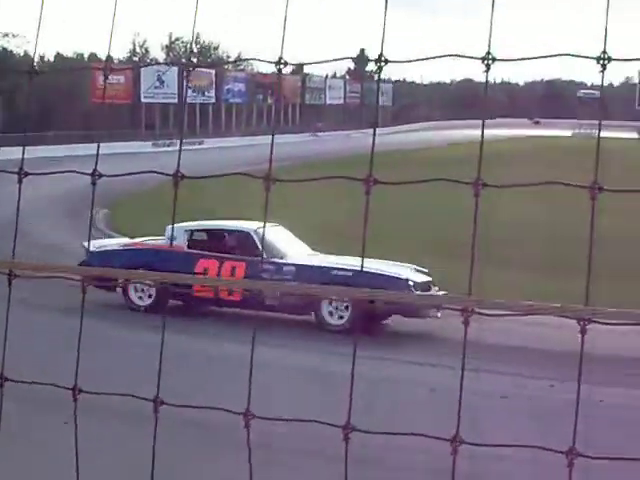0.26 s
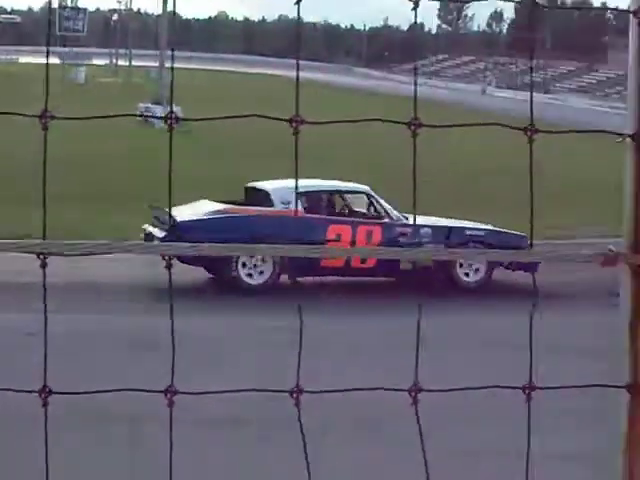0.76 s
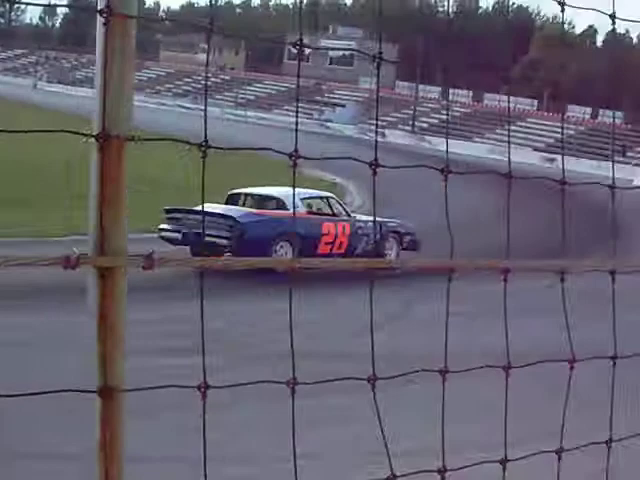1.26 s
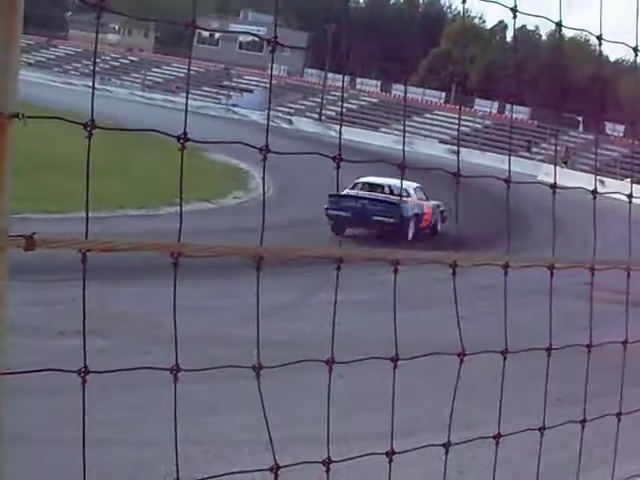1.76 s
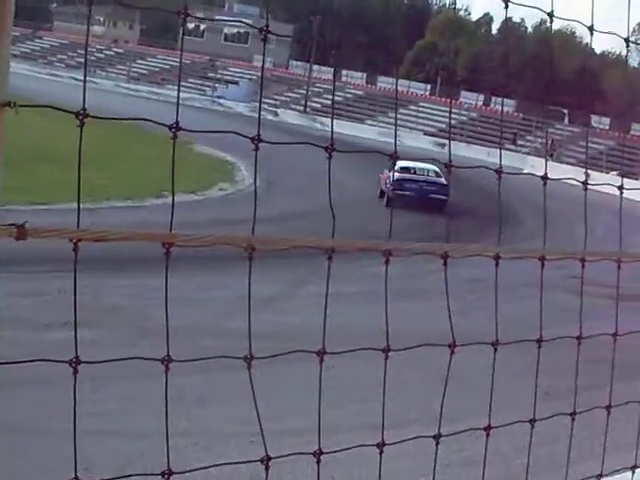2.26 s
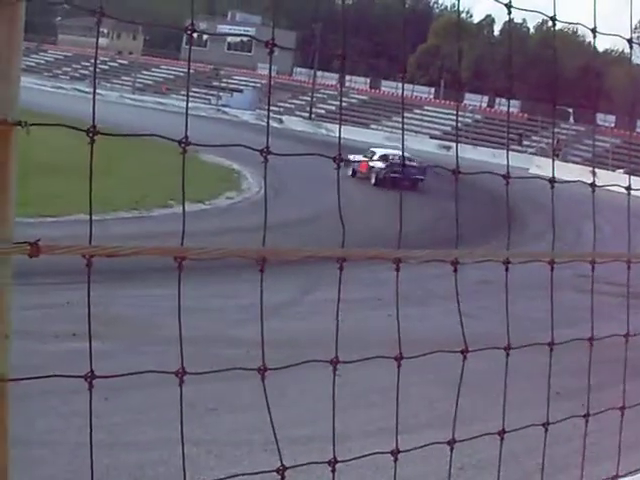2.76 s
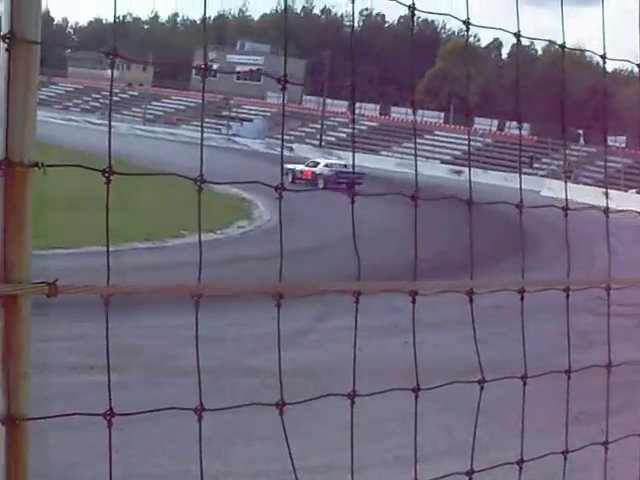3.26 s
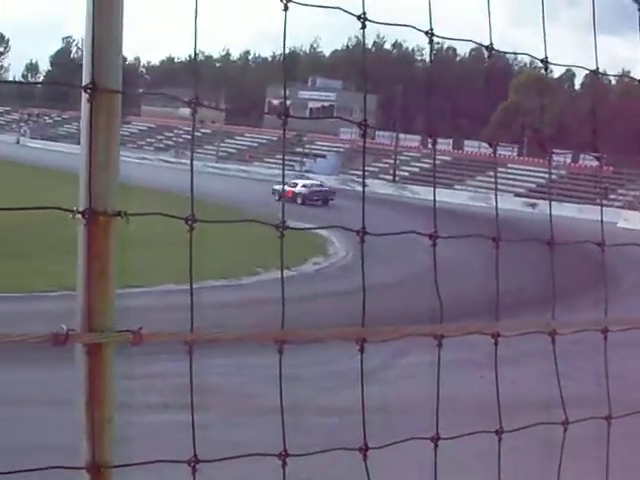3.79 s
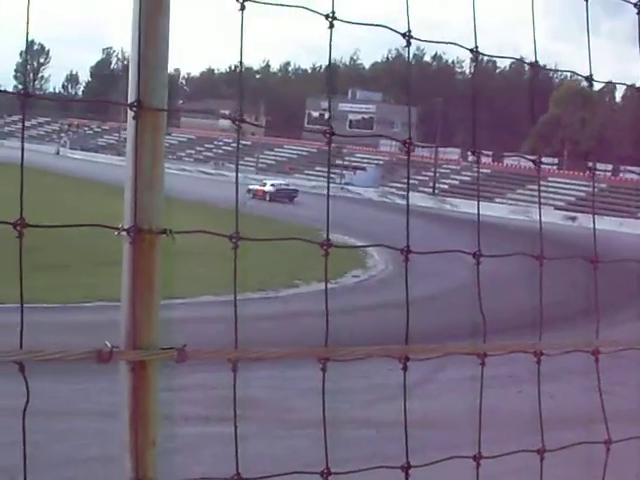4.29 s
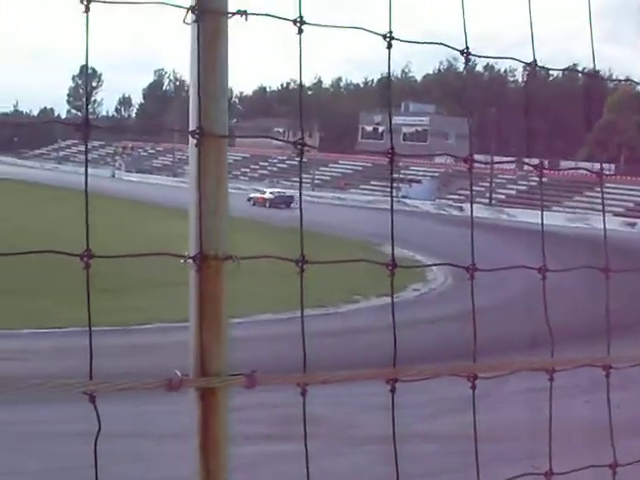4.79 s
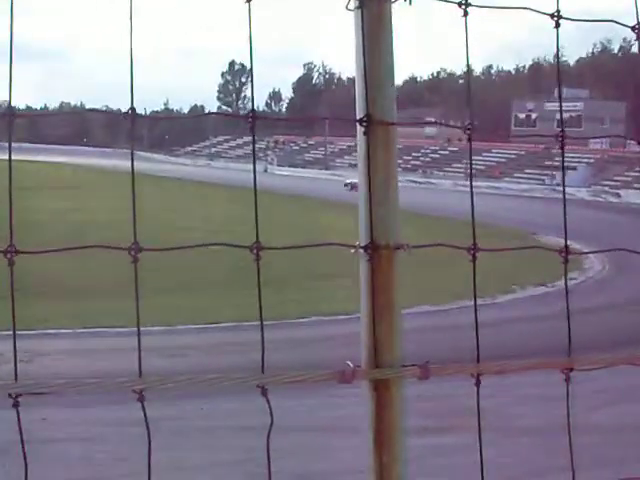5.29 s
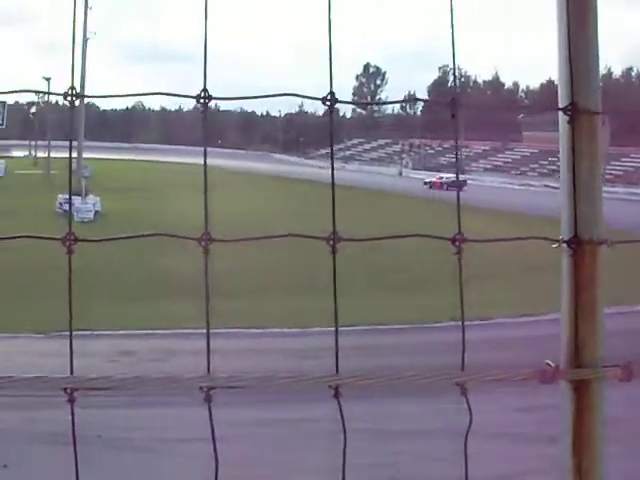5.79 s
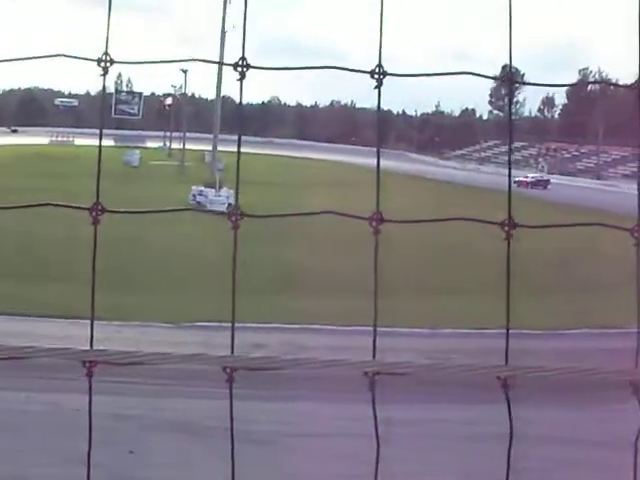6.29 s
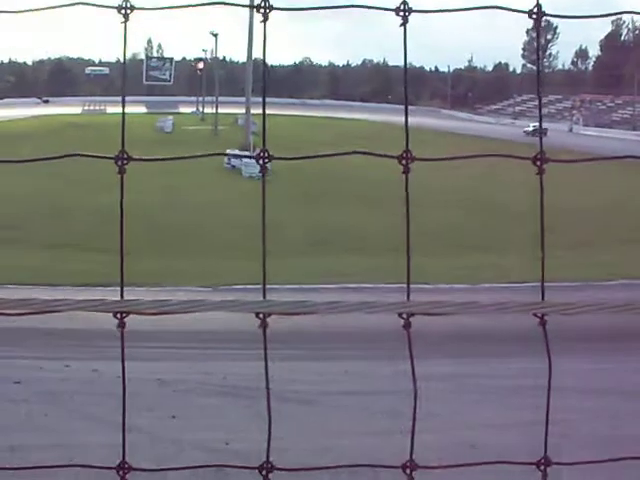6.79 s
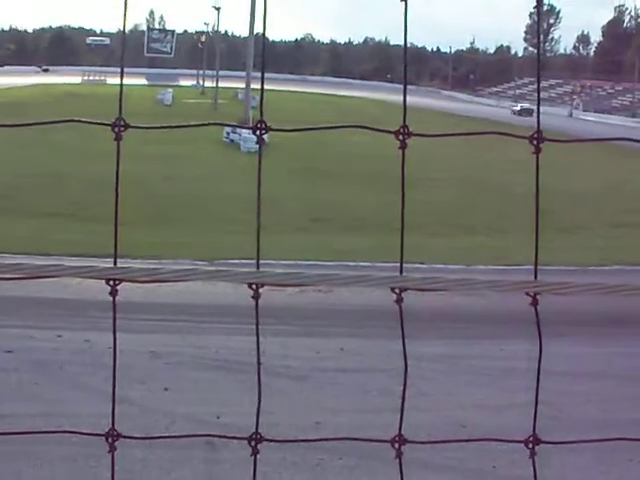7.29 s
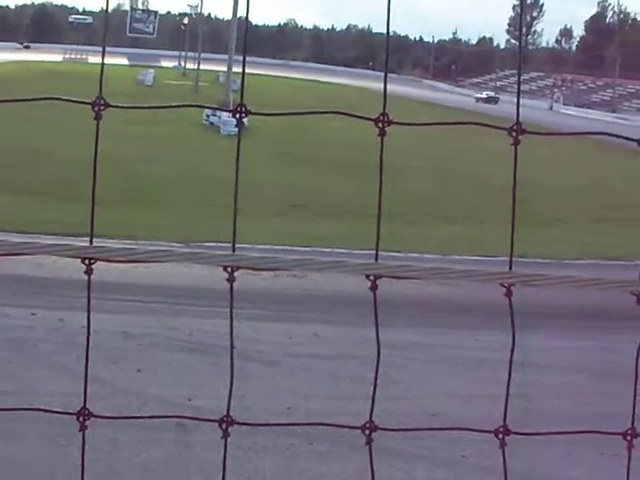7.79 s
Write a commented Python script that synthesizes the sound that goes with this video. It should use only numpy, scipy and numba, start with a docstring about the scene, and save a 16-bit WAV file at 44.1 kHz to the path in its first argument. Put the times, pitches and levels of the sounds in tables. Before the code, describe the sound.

A V8 stock car roars past close by on an outdoor oval, its exhaust blast thumping and overloading a small microphone. The throttle shuts and the pitch drops to a ragged burble with a few sharp cracks. The engine then revs up as it pulls away, lifts again with a faint splutter and crackle, and drones on far off, echoing from the stands. Light wind rumbles underneath.

```python
"""Stock car lapping an oval

A V8 passes close to the fence, lifts off, pulls out of the turn and runs down the far straight.
Its unevenly firing cylinder bank booms, barks and howls, the exhaust gas rasps once a cycle, and
unburnt fuel crackles in the pipes; the stands throw the engine back. As the car goes by, its exhaust
blast thumps a small microphone, which overloads; a light wind rumbles underneath."""
import sys
import numpy as np
from scipy import signal
from scipy.fft import rfft, irfft, next_fast_len
from scipy.io import wavfile
from scipy.ndimage import uniform_filter1d, map_coordinates
from numba import njit

SR = 44100
rng = np.random.default_rng(int(sys.argv[2]) if len(sys.argv) > 2 else 0)


def unload_audio(sound):
    """Save the sound as a 16-bit wav file, at the path given as the first command line argument."""
    columns = np.transpose(np.atleast_2d(sound))
    # keep every value between -1 and 1, then stretch to whole-number steps
    steps = np.round(np.clip(columns, -1, 1) * 32767)
    wavfile.write(sys.argv[1], SR, steps.astype(np.int16))


N = 355005
TIME = np.arange(N) / SR

# engine speed as heard; a cycle is two crank turns and eight firings: (time [s], cycle rate [Hz])
CYCLE_RATE = [(0.0, 33.62), (.33, 33.62), (.49, 31.6), (.53, 26.5), (0.573, 26.03), (0.811, 23.96),
              (1.247, 25.43), (1.562, 25.07), (2.024, 26.45), (2.231, 28.27), (3.469, 33.98),
              (3.709, 34.31), (4.002, 33.71), (4.18, 33.92), (4.462, 30.37), (4.952, 30.61), (5.659, 28.8),
              (6.0, 29.4), (7.05, 29.49), (7.45, 28.32), (8.05, 28.62)]
# the driver's foot: (time [s], throttle [0-1])
PEDAL = [(.45, 0.65), (.55, 0), (2.05, 0.03), (2.15, 0.64), (4.1, 0.98), (4.3, 0.06), (6.4, 0.2),
         (7.0, 0.63)]
# the eight firing slots of a cycle: (pressure pulse [dB], gas rush [dB], header lag [slots])
FIRING_PATTERN = [(-0.5, 2, -0.0086), (-15, -2, 0.051), (-16, 5, -.1), (-5.5, -10, 0.255),
                  (-16, -4, -0.074), (-8.5, -6.5, 0.148), (-10, -4, -0.196), (-13.5, -5, 0.28)]
# how the car faces us: (time [s], side [0 front, 1 beside, 2 behind, 3 leaving the turn, 4 far])
FACING = [(.45, 0.12), (.6, 0.92), (1.95, 1.56), (2.2, 2.38), (2.9, 2.15), (3.3, 2.87), (4.05, 2.63),
          (4.35, 4.14)]

BLAST_S, BLAST_WIDTH_S = 0.31, 0.15  # the pipes point at the fence as the car goes by
HIDDEN_S, HIDDEN_WIDTH_S = 1.22, 0.55  # swinging away, the body hides the pipes
FAR_SHARE = 0.87  # reflected share of the sound at great distance


def undb(db):
    """Decibels to gain."""
    return 10 ** (np.asarray(db) / 20)


def curves(table):
    """Every column of a table, joined by straight lines in time."""
    times, *columns = np.transpose(table)
    return [np.interp(TIME, times, column) for column in columns]


def bell(centre_s, width_s):
    """A smooth swell from 0 to 1 and back."""
    return np.exp(-((TIME - centre_s) / width_s) ** 2)


def drift(rate_hz):
    """Smooth random modulation with a spread of about 1."""
    knots, coarse = rng.standard_normal(4096), TIME[::64]
    return np.interp(TIME, coarse, map_coordinates(knots, [coarse * rate_hz], order=3, mode="wrap"))


def steady(x):
    """Ride the running level to 1, keeping the throb of single cycles."""
    size = SR // 7
    return x / np.sqrt(uniform_filter1d(uniform_filter1d(x * x, size), size) + 1e-12)


def colour(x, points):
    """Minimum-phase EQ through points of (frequency [Hz], gain [dB])."""
    size = 4096
    hz, db = np.transpose(points)
    bins = np.maximum(np.arange(size // 2 + 1) * SR / size, 1)
    cepstrum = irfft(np.log(undb(np.interp(np.log(bins), np.log(hz), db))))
    cepstrum[1:size // 2] *= 2
    cepstrum[size // 2 + 1:] = 0
    return signal.fftconvolve(x, irfft(np.exp(rfft(cepstrum))))[:N]


def band(x, low_hz, high_hz):
    """Steep band-pass without delay."""
    return signal.sosfiltfilt(signal.butter(4, [low_hz, high_hz], "band", fs=SR, output="sos"), x)


@njit
def swept_band(x, hz, width):
    """State-variable band-pass with a moving centre and a width relative to it."""
    out, band_state, low_state = np.empty(len(x)), 0., 0.
    for i in range(len(x)):
        g = np.tan(np.pi * hz[i] / SR)
        passed = (band_state + g * (x[i] - low_state)) / (1 + g * (g + width))
        band_state = 2 * passed - band_state
        low_state += 2 * g * passed
        out[i] = width * passed
    return out


def buffeting(breeze_db=-54, sway_db=3):
    """Over a light breeze, a low thump as the exhaust blast hits the microphone, then two soft gusts."""
    # the exhaust thump, then the two wind gusts: (time [s], half width [s], level [dB])
    air_pushes = [(.255, 0.06, -22), (5.9, 0.55, -45.5), (7.9, 0.55, -42.5)]
    # tone of the buffeting: (frequency [Hz], gain [dB])
    buffet_eq = [(12, -16), (28, 9.5), (50, -10), (90, -12.5), (300, -40.5)]
    breeze = undb(breeze_db + sway_db * drift(2.0))
    swells = sum(undb(db) * bell(s, width) for s, width, db in air_pushes)
    return steady(colour(rng.standard_normal(N), buffet_eq)) * (breeze + swells)


def path(echo_m=35.4, hidden_share=0.67):
    """The car's gain with distance (0 dB at 10 m), and the share of its sound that comes reflected."""
    # the way round the oval: (time [s], distance [m])
    distance = [(0, 13.4), (.5, 14.3), (1.15, 25.2), (2.2, 24.6), (3.7, 46), (4.3, 77), (6, 102.4),
                (8.05, 75)]
    metres, = curves(distance)
    share = FAR_SHARE / (1 + (echo_m / metres) ** 4) + hidden_share * bell(HIDDEN_S, HIDDEN_WIDTH_S / 2)
    return -20 * np.log10(metres / 10), np.clip(share, 0, 1)


def stands(x, t60_s=1.0):
    """Dense reflections from the wall, the stands and the trees."""
    tail = rng.standard_normal(SR) * np.exp(-np.log(1000) * TIME[:SR] / t60_s)
    return signal.fftconvolve(x, tail / np.linalg.norm(tail))[:N]


def ground(x):
    """Far away, the bounce off the ground combs notches into the treble."""
    # the ground reflection: (time [s], lag [ms], gain [linear])
    reflection = [(5.1, 0.27, 0), (5.9, .26, 0.37), (7.8, 0.27, 0.27)]
    lag_ms, gain = curves(reflection)
    bounce = map_coordinates(x, [(TIME - lag_ms / 1000) * SR], order=3)
    return (x + gain * bounce) / np.sqrt(1 + gain ** 2)


def sliding_peak(x, track, width, lift_db=5):
    """An EQ peak that slides as the car moves, stronger as reflections take over."""
    (hz,), (_, indirect) = curves(track), path()
    return x + (undb(lift_db * indirect) - 1) * swept_band(x, hz, width)


def crackle(peak_s=4.76, peak_db=-49, fade_db_per_s=19, pops_per_s=400, ring_s=0.0036, scatter_db=4):
    """Unburnt fuel pops in the pipes on the way into the far straight, building up and dying away."""
    # tone of the pops: (frequency [Hz], gain [dB])
    pop_eq = [(1200, -5), (1950, -0.5), (2700, -16), (7500, -15.5)]
    pops = (rng.random(N) < pops_per_s / SR) * undb(scatter_db * rng.standard_normal(N))
    decays = signal.lfilter([1], [1, -np.exp(-1 / (ring_s * SR))], pops + 1e-12)
    bursts = colour(decays * rng.standard_normal(N), pop_eq)
    return steady(band(bursts, 1300, 8500)) * undb(peak_db - fade_db_per_s * abs(TIME - peak_s))


def splutter(at_s=4.43, width_s=0.08, level_db=-43):
    """A short, hollow splutter just after the throttle closes."""
    return steady(band(rng.standard_normal(N), 240, 483)) * bell(at_s, width_s) * undb(level_db)


def cracks(attack_s=0.001, decay_s=0.002, spread=1.5):
    """Single bursts of gas crack from the pipes and die in a few milliseconds."""
    # cracks off the throttle and in mid-turn: (time [s], level [dB], centre [Hz])
    hits = [(0.62, -20.5, 5300), (0.784, -25.5, 4850), (2.024, -21, 5200), (2.101, -21.5, 4800),
            (2.614, -22, 6100), (2.622, -18, 6800), (2.754, -20.5, 5200), (4.802, -38, 1870)]
    t = TIME[:2048]
    envelope = np.minimum(t / attack_s, 1) * np.exp(-np.maximum(t - attack_s, 0) / decay_s)
    out = np.zeros(N)
    for s, db, hz in hits:
        burst = band(rng.standard_normal(len(t)), hz / spread, hz * spread)
        start = int(s * SR)
        out[start:start + len(t)] += burst / np.std(burst) * envelope * undb(db)
    return out


def crank(start_cycles=-0.62, slip_s=1.13, slip_cycles=0.43):
    """The running count of engine cycles; the beat is less even off the throttle and from afar."""
    (rate,), (throttle,), (_, indirect) = curves(CYCLE_RATE), curves(PEDAL), path()
    # the beat slips back once, as the pipes swing out of sight
    slip = slip_cycles * np.clip((TIME - slip_s) / 0.025 + 0.5, 0, 1)
    wander = 0.00075 + 0.0045 * (1 - throttle) + 0.008 * indirect ** 4
    return start_cycles + np.cumsum(rate) / SR - slip + wander * drift(18)


def burble(hold_s=0.74, echo_db=-9):
    """Low, ragged combustion noise; it swells in the blast and after each lift of the throttle."""
    (throttle,), (_, indirect) = curves(PEDAL), path()
    lift = np.maximum(np.interp(TIME - hold_s, TIME, throttle) - throttle, 0)
    swell = lift * (1 - indirect) + bell(BLAST_S, BLAST_WIDTH_S) / 2
    gain = undb(echo_db) * np.sqrt(indirect) + swell
    return steady(band(rng.standard_normal(N), 110, 379)) * gain * undb(2 * drift(12))


def boom(cycles, trim_db=-1, waver_db=0.75, hump_width_hz=42, rumble_db=-33, bass_loss=0.32):
    """Low orders of the uneven firing: throb, drone, hump and rumble; air and ground make each waver."""
    # the deep throb, order 3 of the cycle: (time [s], level [dB])
    throb_fader = [(0.0, -31.5), (0.28, -28.5), (0.48, -40), (0.55, -28), (1.03, -31), (1.38, -48),
                   (2.09, -54), (2.88, -35.5), (3.83, -35), (4.29, -54), (4.44, -39.5), (6.01, -39),
                   (6.11, -52), (6.86, -43.5), (7.9, -64)]
    # the main drone, order 5: (time [s], level [dB])
    drone_fader = [(0, -35.5), (.2, -28.5), (.45, -23.5), (.55, -34), (.95, -37), (1.9, -33), (2.35, -40),
                   (3.05, -35.5), (4.17, -36), (4.45, -46.5), (5.5, -43), (6.15, -34), (6.7, -41.5),
                   (7.05, -35), (8.05, -33)]
    # the upper boom, a broad hump: (time [s], level [dB])
    hump_fader = [(0, -32.5), (.42, -29), (.6, -35), (1.05, -42.5), (1.25, -30.5), (1.7, -36.5), (2.3, -32),
                  (3.1, -37.5), (4.0, -40.5), (4.6, -46), (6.3, -47), (7.5, -36), (8.05, -36)]
    # the hump shifts as the car turns: (time [s], centre [Hz])
    hump_sweep = [(.4, 302), (.9, 350), (1.15, 192), (1.55, 195), (1.85, 275), (2.25, 215.9), (2.55, 298),
                  (3.05, 250), (5.5, 230), (7, 289)]
    # partials under the hump: (order [per cycle], relative level [dB])
    hump_orders = [(7, -6.5), (8, 0.5), (9, -11.5), (10, -1), (11, 0), (12, -5.5)]
    # weak partials in the rumble: (order [per cycle], relative level [dB])
    rumble_orders = [(1, -15), (2, -7.5), (4, -4.5), (6, 0.5)]
    (rate,), (throttle,), (distance_db, indirect) = curves(CYCLE_RATE), curves(PEDAL), path()
    (throb_db,), (drone_db,) = curves(throb_fader), curves(drone_fader)
    (hump_db,), (centre_hz,) = curves(hump_fader), curves(hump_sweep)
    phases = np.angle(np.fft.fft(undb(np.array(FIRING_PATTERN)[:, 0])))

    def partial(order, ahead=0):
        # slowly changing paths shift the orders against each other, so the beats run together
        shift = (1 + 0.82 * indirect) * drift(0.81)
        phase = 2 * np.pi * order * cycles + phases[order % len(phases)]
        return np.sqrt(2) * np.cos(phase + shift + ahead)

    throb = partial(3) * undb(throb_db + waver_db * drift(13))
    # the drone dips briefly on the far straight, and its phase swings ahead as it does
    dip_s, dip_width_s, dip_db, swing_rad = 7.78, 0.047, -33, 2.63
    swing = swing_rad * np.tanh((TIME - dip_s) / dip_width_s) / 2
    drone_db += dip_db * bell(dip_s, dip_width_s)
    drone = partial(5, ahead=swing) * undb(drone_db + waver_db * drift(14))
    hump = 0
    for order, db in hump_orders:
        resonance = 0.5 + np.exp(-((order * rate - centre_hz) / hump_width_hz) ** 2)
        hump += partial(order) * resonance * undb(db + 3.5 * drift(9))
    weak = sum(partial(order) * undb(db + 5 * drift(7)) for order, db in rumble_orders)
    rumble = undb(-4.5) * steady(weak) + burble()
    rumble *= undb(rumble_db + 0.5 * throttle + bass_loss * distance_db)  # bass carries further
    return (throb + drone + steady(hump) * undb(hump_db)) * undb(trim_db) + rumble


def howl(cycles, pipe_hz=800, pipe_width_hz=120, pipe_db=2.5, muffler_hz=1070):
    """Clean upper orders glide through the tailpipe resonance and break up as the car rushes by."""
    # upper partials of the firing pattern: (order [per cycle], relative level [dB])
    howl_orders = [(15, -2), (16, -0.5), (18, 0.5), (19, 2.5), (23, -1), (24, -0.5), (25, 2.5), (29, -4),
                   (30, -3)]
    (rate,), (side,) = curves(CYCLE_RATE), curves(FACING)
    rushing = np.maximum(1 - side, 0)
    tones = 0
    for order, db in howl_orders:
        hz = order * rate
        resonance_db = pipe_db * np.exp(-((hz - pipe_hz) / pipe_width_hz) ** 2)
        waver_db = 3 * drift(2.9) + 5 * rushing * drift(28.6)
        gain = undb(db + resonance_db + waver_db) / (1 + (hz / muffler_hz) ** 8)
        tones += gain * np.cos(2 * np.pi * order * cycles + drift(1.172))
    return steady(tones * undb(2 * drift(30)))


def shocks(cycles, level_db=-13, push_s=0.00094, second_lag_cycles=0.21, second_db=-6, fade_db=-9):
    """Under load two firings a cycle steepen into fronts that jump up, fall back and leave a suction."""
    (throttle,), (side,), (_, indirect) = curves(PEDAL), curves(FACING), path()
    counts = np.floor(cycles), np.floor(cycles - second_lag_cycles)
    first, second = (np.diff(count, prepend=count[0]) > 0 for count in counts)
    age = TIME[:1024] / push_s
    fronts = signal.fftconvolve(first + undb(second_db) * second, (1 - age) * np.exp(-age))[:N]
    return fronts * np.sqrt(throttle) * np.clip(4 - side, 0, 1) * undb(level_db + fade_db * indirect)


def firings(cycles, jitter_slots=0.038, decay_slots=0.77, leaving_db=4):
    """Each opening valve gives a pressure pulse and a fading gas rush; unequal headers make them limp."""
    (throttle,), (side,) = curves(PEDAL), curves(FACING)
    slots, number = len(FIRING_PATTERN), np.arange(4096)
    pulse_db, gas_db, lag = np.array(FIRING_PATTERN)[number % slots].T
    pulse_scatter, gas_scatter, lag_scatter = rng.standard_normal((len(number), 3)).T
    arrived = np.interp((cycles + 1) * slots, number + lag + jitter_slots * lag_scatter, number)
    firing = arrived.astype(int)
    onsets = np.maximum(np.diff(firing, prepend=firing[0]), 0)
    pulses = onsets * undb(pulse_db - 1.3 * pulse_scatter)[firing]
    # off the throttle the cylinders differ more; head-on they sound more alike
    contrast = 1 + 0.12 * (1 - throttle) - 0.25 * np.maximum(1 - side, 0)
    rush_db = (gas_db + 2 * gas_scatter)[firing] * contrast
    # leaving the turn, the first cylinder stands out
    rush_db += leaving_db * np.maximum(1 - abs(side - 3), 0) * (firing % slots == 0)
    rush = undb(rush_db) * np.exp(-(arrived - firing) / decay_slots)
    rush = uniform_filter1d(rush, size=45)  # soft attack: the valve takes a moment to open
    return steady(pulses), steady(rush * rng.standard_normal(N))


def underbody(pulses, ring_s=0.017, rattle_db=-4, paths=6):
    """The pulses rattle under the body, by paths that come and go as the car moves."""
    t = TIME[:2048]
    rings = rng.standard_normal((paths, len(t))) * np.exp(-t / ring_s)
    rattle = sum(drift(2.75) * signal.fftconvolve(pulses, ring)[:N] for ring in rings)
    return steady(pulses + undb(rattle_db) * steady(rattle))


def radiate(x, low_hz, high_hz, wet):
    """One register of the exhaust, partly reflected and coloured by the side that faces the fence."""
    # exhaust tone from each of the five sides: (frequency [Hz], gain [dB])
    front_eq = [(400.0, -2.5), (540.0, -0.5), (840.0, 0.5), (1020.0, -5), (2130.0, 1.5), (3160.0, -19.5),
                (5710.0, -16.5), (7300.0, -18.5)]
    beside_eq = [(400.0, 5.5), (420.0, -3.5), (760.0, 5.5), (1020.0, -9), (1590.0, -1), (2600.0, -10.5),
                 (2870.0, -18.5), (5170.0, -15), (7300.0, -20)]
    behind_eq = [(400.0, -8.5), (560.0, 5), (690.0, -3), (1050.0, -2), (2440.0, -13.5), (4790.0, -9),
                 (5670.0, -22), (7300.0, -9)]
    leaving_eq = [(400.0, -4), (560, -3), (820.0, -4.5), (1250.0, -12.5), (1750.0, -5.5), (2440.0, -13.5),
                  (3020.0, -15), (4220.0, -14.5), (7300.0, -17)]
    far_eq = [(400.0, -10), (650.0, -4), (880.0, -10.5), (1070.0, -4), (1510.0, -0.5), (1840.0, -4),
              (2350.0, -11.5), (2730.0, -7), (5000.0, -6.5), (5710.0, -10), (7300.0, -15.5)]
    (side,), (_, indirect) = curves(FACING), path()
    share = np.clip(wet * indirect, 0, 1)
    heard = np.sqrt(1 - share) * x + np.sqrt(share) * stands(x)
    blend = 0
    for k, eq in enumerate((front_eq, beside_eq, behind_eq, leaving_eq, far_eq)):
        crossfade = np.maximum(1 - abs(side - k), 0)
        blend += crossfade * steady(band(colour(heard, eq), low_hz, high_hz))
    return steady(blend)


def exhaust(cycles, throttle_db=8.5, pulse_drive_db=10, blur_db=13, tip_in_s=0.47):
    """Pressure pulses bark in the mids; higher up, rushing gas takes over as growl and rasp."""
    # base mix, one row per side from front to far: (howl [dB], bark [dB], growl [dB], rasp [dB])
    side_mix = [(-38, -33.5, -29, -27), (-40.5, -34, -32, -29.5), (-35.5, -36, -37, -28.5),
                (-36.5, -36.5, -39.5, -36.5), (-41.5, -36, -38, -39)]
    # the peak that slides through the growl: (time [s], centre [Hz])
    growl_sweep = [(2.3, 1147), (3.6, 1740), (4.6, 1900), (6, 1430), (8.05, 1248)]
    # the peak that slides down through the rasp: (time [s], centre [Hz])
    rasp_sweep = [(2.7, 4700), (3.9, 4170), (7.1, 4050), (7.9, 3450)]
    (throttle,), (side,), (distance_db, indirect) = curves(PEDAL), curves(FACING), path()
    howl_db, bark_db, growl_db, rasp_db = (np.interp(side, range(5), db) for db in np.transpose(side_mix))
    hidden, blast = bell(HIDDEN_S, HIDDEN_WIDTH_S), bell(BLAST_S, BLAST_WIDTH_S)
    flare = bell(2.66, 0.15)  # the rasp flares in mid-turn
    snap = bell(0.517, 0.02)  # the gas chokes for an instant as the throttle snaps shut
    # the growl swells for a moment as the throttle opens
    tip_in = np.maximum(throttle - np.interp(TIME - tip_in_s, TIME, throttle), 0)
    pulses, gas = firings(cycles)
    # over a long, scattered path the pulses sink into the roar of the gas
    pulse_db = pulse_drive_db * (throttle - 0.5) - blur_db * (indirect / FAR_SHARE) ** 8
    pulses = underbody(pulses) * undb(pulse_db)
    bark = radiate(pulses + undb(-12 + 8.5 * blast) * gas, 310, 1140, wet=0.71) * undb(bark_db)
    mids = (bark + howl(cycles) * undb(howl_db)) * undb(1.5 * throttle)
    growl = radiate(undb(-2) * pulses + gas, 946, 2810, wet=1.15)
    growl *= undb(growl_db - 4.5 * hidden + 7.5 * tip_in + 3 * blast)
    growl = sliding_peak(growl, growl_sweep, width=0.31)
    rasp = radiate(undb(-24) * pulses + gas, 2720, 8580, wet=0.79)
    rasp *= undb(rasp_db - 11 * hidden + 2.5 * flare + drift(13))
    rasp = sliding_peak(ground(rasp), rasp_sweep, width=0.12)
    return (mids + shocks(cycles) + growl + rasp) * undb(distance_db + throttle_db * throttle - 3 * snap)


def scene():
    """The engine, its cracks, crackle and splutter, and the air on the microphone, in mono."""
    cycles = crank()
    return (boom(cycles) + exhaust(cycles) + cracks() + crackle() + splutter() + buffeting())[None]


def record(dry, positive_limit=0.25, negative_limit=0.17, top_hz=8900):
    """The microphone clips, sooner on the negative side; the treble is rolled off, then cut."""
    limit = np.where(dry > 0, positive_limit, negative_limit)
    clipped = dry / (1 + (dry / limit) ** 6) ** (1 / 6)
    size = next_fast_len(N + SR)
    hz = np.fft.rfftfreq(size, 1 / SR)
    rolloff_db = np.interp(hz, [7450, 7900, 8400, top_hz], [0, -12.5, -12, -18.5])
    cut = 1 / (1 + (hz / top_hz) ** 90)
    return irfft(rfft(clipped, size) * undb(rolloff_db) * cut, size)[:, :N]


dry = scene()
out = record(dry)
unload_audio(out)
```